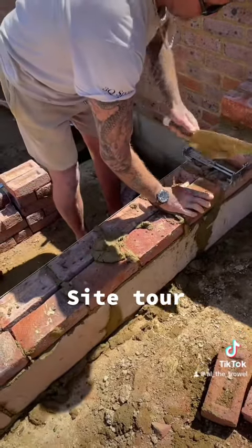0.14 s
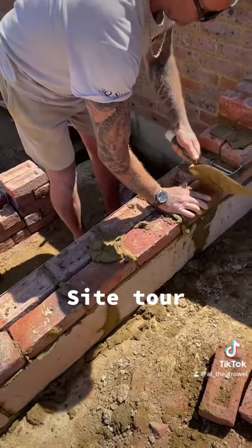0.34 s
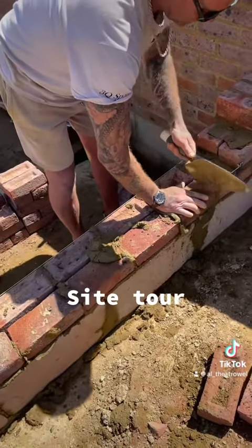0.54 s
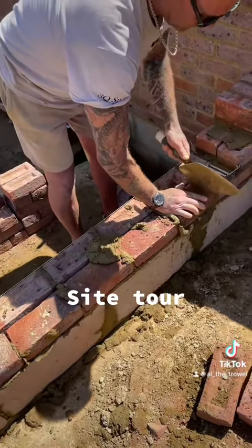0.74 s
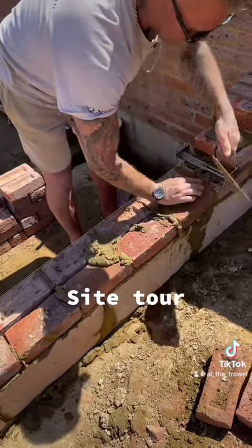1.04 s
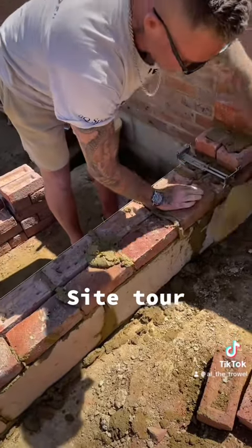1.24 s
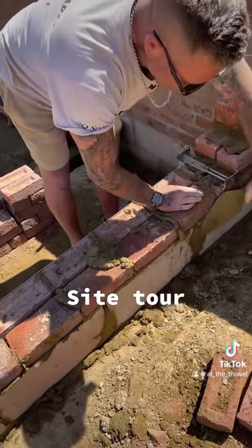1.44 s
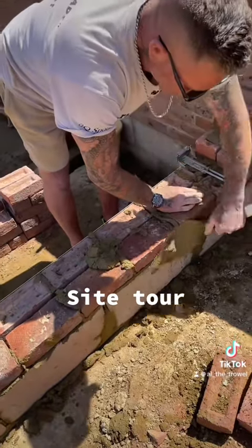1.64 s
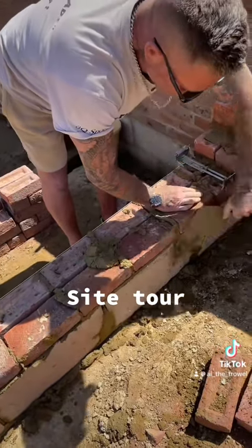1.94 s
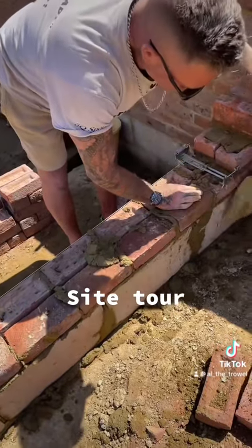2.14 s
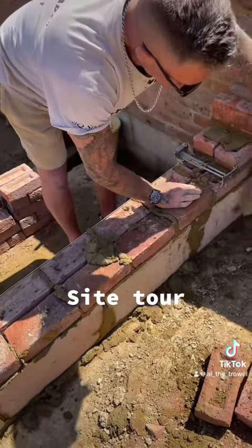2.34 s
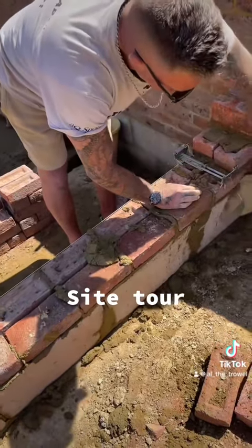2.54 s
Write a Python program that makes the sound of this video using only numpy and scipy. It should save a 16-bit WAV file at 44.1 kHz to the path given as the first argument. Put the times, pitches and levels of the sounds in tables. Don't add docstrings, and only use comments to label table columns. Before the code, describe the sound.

A steel trowel works on a brick wall, heard close outdoors. The tail of a tap fades at the start; a hard, dry knock at 0.2 s and a duller one at 0.4 s ring briefly with a slight echo. Two gritty scrapes run from 1.0 to 1.4 and 1.4 to 1.75 s, the blade ringing. A chattering, skipping scrape follows from 2.1 to 2.45 s. Very faint engine hum and distant machinery lie underneath.

```python
import sys
import numpy as np
from scipy import signal
from scipy.io import wavfile

SR = 44100
rng = np.random.default_rng(int(sys.argv[2]) if len(sys.argv) > 2 else 0)


def waveform_to_disk(signal):
    frames = np.transpose(np.atleast_2d(signal))
    scaled = np.clip(frames, -1, 1) * 32767
    samples = np.round(scaled).astype(np.int16)
    wavfile.write(sys.argv[1], SR, samples)


def level_to_linear(level):
    exponent = np.asarray(level, float) / 20
    return 10 ** exponent


N = 119070
TIME = np.arange(N) / SR


def rms_one(x):
    return x / np.sqrt(np.mean(x ** 2) + 1e-20)


def noise():
    return rng.standard_normal(N)


def drift(rate_hz):
    run_in = SR // 8
    r = np.exp(-2 * np.pi * rate_hz / SR)
    slow = signal.lfilter([1], [1, -2 * r, r * r], rng.standard_normal(N + run_in))
    return rms_one(slow[run_in:])


def colour(x, points, patch_db=0.):
    hz, db = np.transpose(points)
    bands = int(3 * np.log2(hz[-1] / hz[0])) + 1
    edges = np.geomspace(hz[0], min(hz[-1], SR / 2.2), bands + 1)
    out = 0
    for k, (low, high) in enumerate(zip(edges, edges[1:])):
        level_db = np.interp(np.log(low * high) / 2, np.log(hz), db)
        gain = level_to_linear(level_db + patch_db * drift(20))
        band = signal.butter(2, [low, high], "band", fs=SR, output="sos")
        out = out + gain * signal.sosfilt(band, x[k % 2])
    return rms_one(out)


def resonate(x, hz, width_hz):
    r = np.exp(-np.pi * width_hz / SR)
    poles = [1, -2 * r * np.cos(2 * np.pi * hz / SR), r * r]
    return signal.lfilter([1, 0, -1], poles, x + 1e-18) * (1 - r * r) / 2


def burst(start, attack, hold, t60):
    out = np.zeros(N)
    end = start + attack + hold + 2 * t60
    span = slice(max(int(start * SR), 0), max(int(end * SR), 0))
    t = TIME[span] - start
    rise = np.clip(t / max(attack, 1e-4), 0, 1)
    out[span] = rise * level_to_linear(-60 * np.clip(t - attack - hold, 0, 9) / t60)
    return out


def brick_taps():
    # t/s, peak/dB, brightness/dB per octave above 1500 Hz
    tap_times = [
        (-.062, -15.5, -2),
        (0.2118, -11.5, 0),
        (0.4019, -17, -3.5),
    ]
    # f/Hz, level/dB, t60/s
    brick = [(185, -28.5, 0.057), (493, -18, 0.035), (1000, -26, 0.0068), (1265, 2.5, 0.015),
             (1617, -4, 0.015), (2070, -1.5, 0.016), (2223, -6, 0.012), (2600, -2.5, .011),
             (2866, -6, 0.007), (4165, -17.5, 0.016), (4740, -19.5, 0.021), (5360, -16.5, 0.012)]
    # f/Hz, width/Hz, level/dB
    yard = [(417.6, 1000, 2), (1110, 570, 1.5), (1590, 430, -3), (2210, 130, 9)]
    # delay/s, level/dB
    slap_backs = [(0.0095, -27), (.021, -53), (0.064, -34)]
    contact_s = 0.00094
    echo_s, echo_spread_s = 0.074, 0.0063

    near, far = np.zeros(N), np.zeros(N)
    walls = signal.butter(6, 2570, fs=SR, output="sos")
    answer = sum(level_to_linear(db) * resonate(noise(), hz, width) for hz, width, db in yard)
    dull = rms_one(signal.sosfilt(walls, answer))
    crack = rms_one(np.diff(noise(), prepend=0))
    for s, db, bright_db in tap_times:
        t = np.clip(TIME - s, 0, 1)
        onset = 1 - np.exp(-t / contact_s)
        for hz, mode_db, t60 in brick:
            tilt_db = bright_db * max(np.log2(hz / 1500), 0)
            near += level_to_linear(db + mode_db + tilt_db - 60 * t / t60) * np.sin(2 * np.pi * hz * t) * onset
        near += level_to_linear(db - 20 + bright_db) * crack * burst(s, contact_s, 0, 0.038)
        tail = level_to_linear(-29) * burst(s, 0.0041, 0, 0.071)
        echo = level_to_linear(-53.5) * np.exp(-((TIME - s - echo_s) / echo_spread_s) ** 2 / 2)
        distant = level_to_linear(-49) * burst(s, 0.005, 0, 0.6)
        far += level_to_linear(db) * dull * (tail + echo + distant)
    slaps = sum(level_to_linear(db) * np.roll(near, int(lag * SR)) for lag, db in slap_backs)
    return near + far + signal.sosfilt(walls, slaps)


def edge_pressure():
    # t/s, level/dB, blade ringing/dB, deep modes/dB
    strokes = [
        [(.995, -77, -9.5, 4), (1.012, -67, -15, 10), (1.05, -69, -9, -6), (1.064, -58.5, 4, -9),
         (1.2, -49, 1.5, 3), (1.27, -41.5, -2.5, -18), (1.32, -47.5, 6, -10.5), (1.385, -58.5, 7.5, -6),
         (1.42, -88, 16, 12)],
        [(1.421, -81.5, 13, -0.5), (1.45, -61.5, 15.5, -4), (1.495, -52.5, 3, -5), (1.55, -40.5, -2.5, -5),
         (1.64, -40.5, -5, -3.5), (1.69, -47.5, 0.5, 10), (1.745, -48.5, -9, 13), (1.762, -72, 3, -2),
         (1.83, -83.5, -2, -9)],
    ]
    # t/s, peak/dB, length/s, ringing/dB, deep modes/dB
    skips = [(2.1, -38, 0.0049, 3.5, -4), (2.113, -41, 0.0037, -3, -4), (2.138, -32.5, 0.0043, -12, 4),
             (2.155, -36.5, 0.0044, 3.5, 3), (2.168, -39.5, 0.012, -6, -10), (2.191, -35, 0.007, 6, 2.5),
             (2.204, -38, 0.014, -1, 8), (2.231, -34.5, 0.011, -1.5, -3), (2.264, -30.5, 0.0094, -1.5, -6),
             (2.314, -32, 0.006, -0.5, -9), (2.351, -32, 0.019, -4, 9), (2.384, -34, 0.019, -3, 0),
             (2.402, -40.5, 0.004, -2, -25), (2.42, -49, 0.028, -29, -11), (2.433, -34, 0.0063, 2, -5),
             (1.459, -31, 0.0033, -11, -21), (1.541, -39, 0.0057, -3, -9), (1.246, -35, 0.0064, 2, -19),
             (1.783, -52, 0.0026, 0, -19), (2.061, -65, 0.0016, 0.5, -12), (1.699, -33.5, 0.0056, -21, -5)]
    # t/s, peak/dB, ringing/dB
    snags = [(1.008, -63, -13.5), (1.041, -57, -8), (1.058, -40.5, -12), (1.076, -42, 1), (1.118, -45, 9),
             (1.139, -48, 7.5), (1.158, -42.5, -8), (1.18, -42, 8), (1.194, -45.5, -2), (1.209, -42.5, -2),
             (1.226, -47.5, -6), (1.275, -41, 0), (1.295, -48.5, -6), (1.309, -46, 8), (1.339, -43, 5),
             (1.362, -40.5, 1.5), (1.382, -46.5, 0.5), (1.431, -53.5, 10), (1.444, -50.5, 6.5),
             (1.481, -46.5, -1.5), (1.508, -47.5, 0), (1.518, -39, -3), (1.581, -38, -2), (1.594, -36, -4),
             (1.624, -39.5, -4), (1.643, -40.5, 5), (1.657, -48, -3), (1.721, -41, -5)]
    snag_s, snag_deep_db = 0.0041, -6.0
    attack_s = 0.0017

    drag, ringing, deep = np.zeros((3, N))
    judder = level_to_linear(0.97 * drift(70))
    for s, db, ring_db, deep_db in map(np.transpose, strokes):
        drag += level_to_linear(np.interp(TIME, s, db, -140, -140)) * judder
        ringing += level_to_linear(np.interp(TIME, s, db + ring_db, -140, -140)) * judder
        deep += level_to_linear(np.interp(TIME, s, db + ring_db + deep_db, -140, -140)) * judder
    catches = [(s, db, snag_s, ring_db, snag_deep_db) for s, db, ring_db in snags]
    for s, db, length, ring_db, deep_db in [*skips, *catches]:
        hit = burst(s, attack_s, length, 0.03)
        dragging_on = level_to_linear(-20.5) * burst(s, attack_s, length, 0.2)
        shape = level_to_linear(db - 11.5) * (hit + dragging_on)
        drag += shape
        ringing += level_to_linear(ring_db) * shape
        deep += level_to_linear(ring_db + deep_db) * shape
    return drag, ringing, deep


def sand_grains():
    grains_per_s, spread_db = 4000, 3
    sizes = level_to_linear(spread_db * np.minimum(rng.exponential(1, (2, N)), 4))
    sizes = sizes * rng.choice([-1, 1], (2, N))
    return rms_one(sizes * (rng.random((2, N)) < grains_per_s / SR))


def crushed_grit(drag, grains):
    # f/Hz, level/dB
    grit_colour = [(170, -27), (300, -7), (1300, -10.5), (3500, -10), (9500, -10), (11500, -23.5),
                   (15000, -12.5), (17000, -23.5)]
    grit = drag * colour(grains, grit_colour, 4)
    return grit - resonate(grit, 6520, 250)


def blade_ring(drag, ringing, deep):
    # f/Hz, width/Hz, level/dB
    blade = [(251.3, 48, -9.5), (380, 380, -17), (834, 40, -3.5), (1234, 85, -3), (1322, 59, 1.5),
             (1450, 49, -2), (1910, 280, -6.5), (2870, 540, -10.5), (4165, 220, -12.5), (4800, 300, -14.5),
             (6245, 190, -4), (7380, 120, -12), (9000, 390, -9), (10340, 100, -43.5)]
    out = 0
    for hz, width, db in blade:
        drive = deep if hz < 1000 else ringing if hz < 2500 else drag
        rubbing = drive * level_to_linear(2.5 * drift(15)) * noise()
        out = out + level_to_linear(db + 31.5) / np.sqrt(width) * resonate(rubbing, hz, width)
    return out


def blade_streaks(drive):
    low_hz, high_hz, modes = 1600, 10500, 36
    swells = [level_to_linear(3 * drift(7)) for _ in range(9)]
    mode_hz = np.geomspace(low_hz, high_hz, num=modes) * rng.uniform(0.97, 1.02, modes)
    out = 0
    for k, hz in enumerate(mode_hz):
        swell = np.roll(swells[k % 9], k * SR // 9)
        out = out + resonate(drive * swell, hz, 60 * np.sqrt(hz / low_hz))
    return out


def hard_grains():
    # t/s, level/dB, f/Hz
    pings = [(2.102, -35, 810), (1.55, -40.5, 378), (1.53, -44, 410), (1.697, -49.5, 250),
             (1.181, -36.5, 1350), (1.293, -35, 1150), (1.656, -32, 1310), (1.686, -36, 836),
             (1.46, -37, 1250), (1.6, -36.5, 1100), (1.642, -35, 1310), (1.065, -52, 810), (1.64, -40, 846),
             (1.665, -43.5, 910), (1.715, -42.5, 830), (1.62, -39, 1500), (1.572, -39.5, 980),
             (1.722, -41.5, 1700), (1.7, -40.5, 6150), (1.58, -42, 4500), (1.3, -42, 5500),
             (1.3, -48.5, 5400), (1.5, -48, 4400), (1.25, -41, 6600), (1.4, -50, 2100), (1.5, -38.5, 7400),
             (1.6, -45, 2180), (2.115, -51, 10000), (2.272, -40, 820), (2.356, -44.5, 750),
             (2.386, -41, 820), (2.404, -38, 1300), (2.356, -42, 1270), (2.267, -45, 1200),
             (2.318, -43.5, 1400), (3, -40, 2440), (2.437, -50, 814), (2.267, -49, 2800),
             (2.195, -43, 1292), (1.2, -41, 2200), (1.21, -50, 290), (2.102, -48.5, 236), (2.112, -51, 155),
             (2.195, -47.5, 220), (2.236, -49.5, 197), (2.3, -52, 170), (2.39, -53, 155), (1.7, -54, 99),
             (.402, -49, 244), (1.433, -51, 1200), (1.085, -46.5, 1330), (1.25, -40, 1270)]
    out = 0
    for s, db, hz in pings:
        t60 = np.clip(58 / hz, 0.029, 0.072)
        out = out + level_to_linear(db) * burst(s, 0.0026, 0, t60) * np.sin(2 * np.pi * hz * (TIME - s))
    return out


def trowel_scrapes():
    drag, ringing, deep = edge_pressure()
    grains = sand_grains()
    streaks = level_to_linear(-3) * blade_streaks(drag * grains[0])
    return crushed_grit(drag, grains) + blade_ring(drag, ringing, deep) + hard_grains() + streaks


def sleeve_rustles():
    # t/s, length/s, level/dB
    rustles = [(.01, 0.023, -77), (0.274, 0.081, -77), (0.357, .04, -84), (0.459, 0.055, -73),
               (0.57, 0.12, -80.5), (0.807, 0.07, -85), (0.955, 0.093, -79), (1.873, 0.081, -83.5),
               (2.509, 0.024, -85), (2.685, 0.032, -82.5)]
    humps = sum(level_to_linear(db - 10.0 * ((TIME - at) / length * 2) ** 2) for at, length, db in rustles)
    return humps * level_to_linear(2.53 * drift(45))


def far_engine():
    # f/Hz, flutter/Hz, level/dB
    engine = [(96.5, 5.9, -1), (133, 6.9, -12.5), (179.4, 29, -12.5)]
    # t/s, level/dB
    surges = [(0.119, -72), (.24, -71.5), (.49, -68.5), (.82, -74.5), (.99, -69.5), (1.151, -89.5),
              (1.3, -68.5), (1.56, -66.5), (1.82, -76.5), (2.12, -70), (2.4, -75)]
    idle_db, surge_s = -79, 0.035
    load = level_to_linear(idle_db) + sum(level_to_linear(db) * np.exp(-((TIME - at) / surge_s) ** 2 / 2) for at, db in surges)
    hum = 0
    for hz, rate, db in engine:
        level = level_to_linear(db + 1.0 + 3.3 * drift(rate))
        hum = hum + level * np.sin(2 * np.pi * hz * TIME + 0.18 * drift(rate))
    return load * hum


def site_background():
    # t/s, murmur/dB, hiss/dB
    site = [(0, -83, 9), (.5, -80, 2), (0.699, -85, 3), (1, -81.5, -3), (1.841, -81, 2.5), (2.05, -90.5, 3),
            (2.501, -80, 10.5), (2.7, -87.5, 5.5)]
    # f/Hz, level/dB
    murmur_colour = [(250, -4), (570, -5), (1050, 1), (2200, -5), (2800, -12), (4000, -18)]
    # f/Hz, level/dB
    hiss_colour = [(1760, -17), (3000, 4.5), (3660, -12.5), (3840, 4.5), (7850, 4.5), (15500, -5.5)]
    # f/Hz, level/dB
    rumble_colour = [(12, -12), (20, 1.5), (64, -9.5), (97, -7.5), (156, -21.5), (198, -14.5), (400, -43),
                     (520, -83), (880, -120)]
    s, db, hiss_db = np.transpose(site)
    white = rng.standard_normal((3, 2, N))
    murmur = level_to_linear(np.interp(TIME, s, db)) * colour(white[0], murmur_colour, 1.5)
    hiss_level = level_to_linear(-95.5 + np.interp(TIME, s, hiss_db)) + sleeve_rustles()
    hiss = hiss_level * colour(white[1], hiss_colour, 0.96)
    rumble = level_to_linear(-71) * colour(white[2], rumble_colour, 1.5)
    return murmur + hiss + rumble + far_engine()


def scene():
    return (brick_taps() + trowel_scrapes() + site_background())[None]


def roll_off(x):
    return signal.sosfilt(signal.butter(12, 16480, fs=SR, output="sos"), x)


def record(dry):
    top_cut = signal.cheby2(14, 60, 16100, fs=SR, output="sos")
    mix = signal.sosfilt(top_cut, dry)
    return roll_off(mix)


dry = scene()
out = record(dry)
waveform_to_disk(out)
```